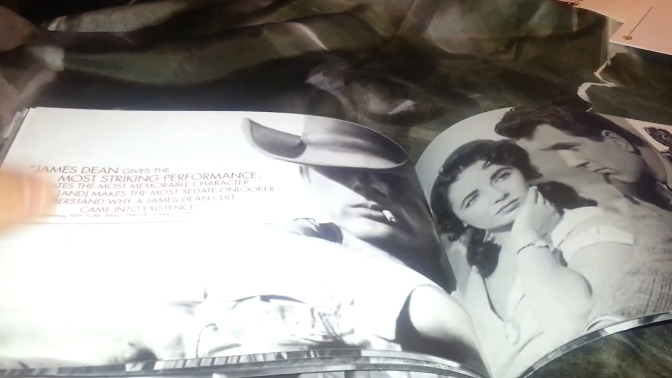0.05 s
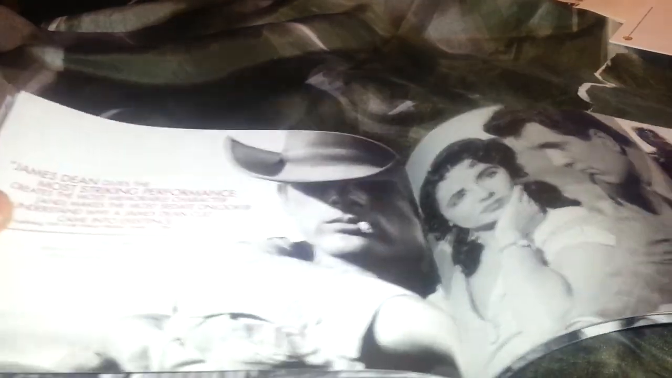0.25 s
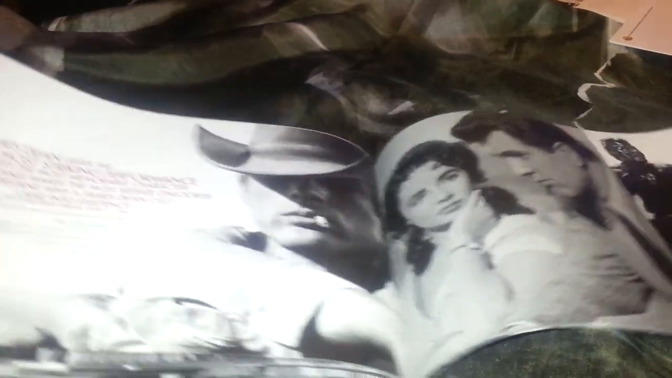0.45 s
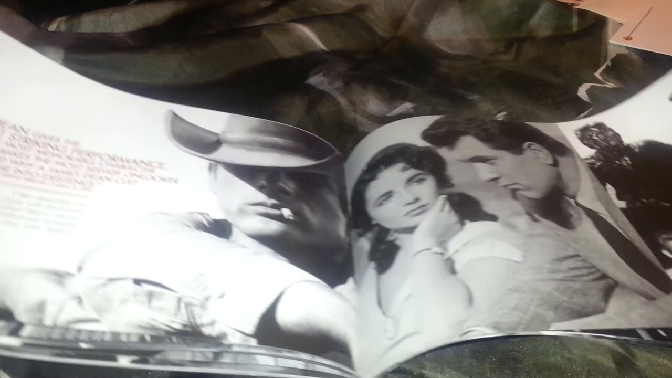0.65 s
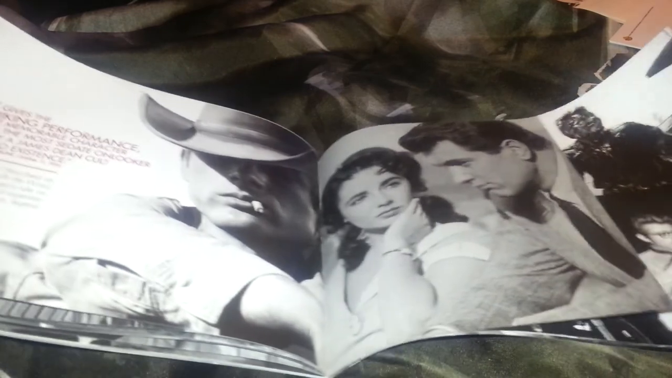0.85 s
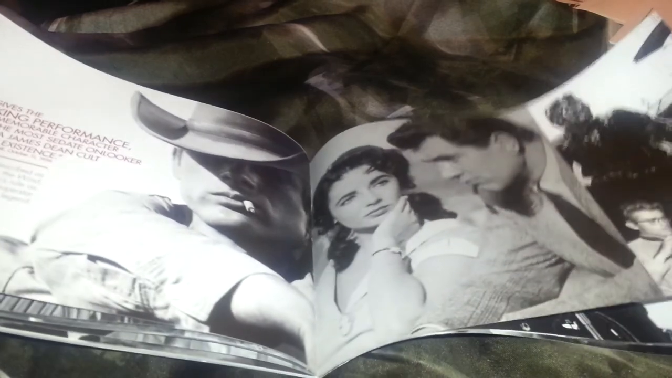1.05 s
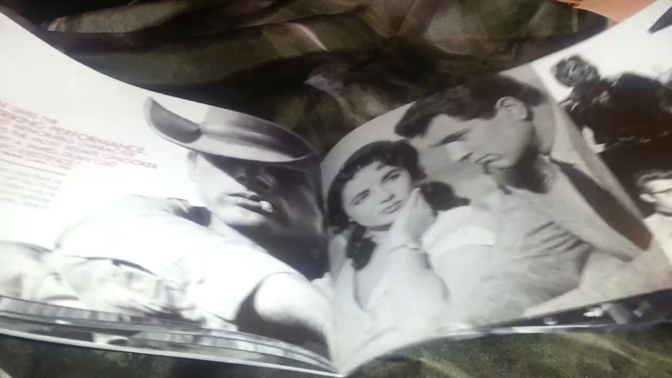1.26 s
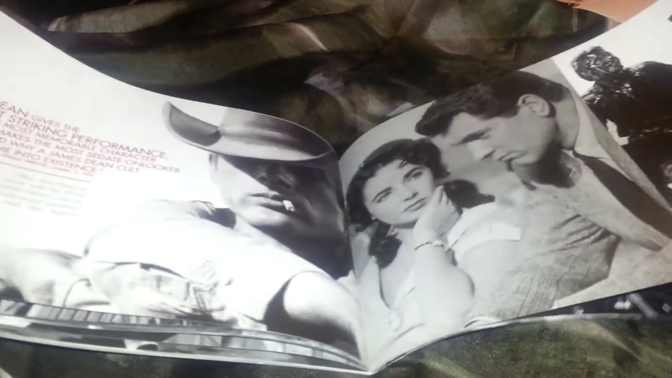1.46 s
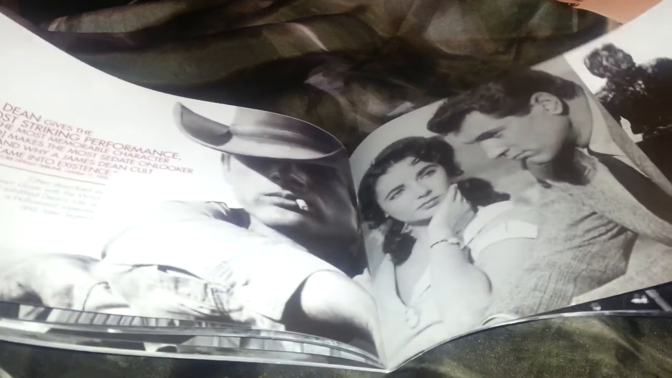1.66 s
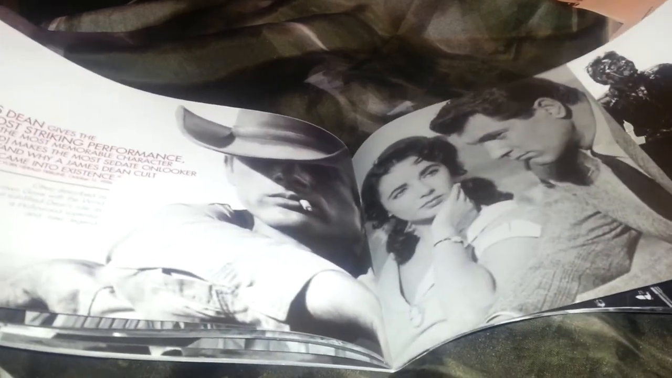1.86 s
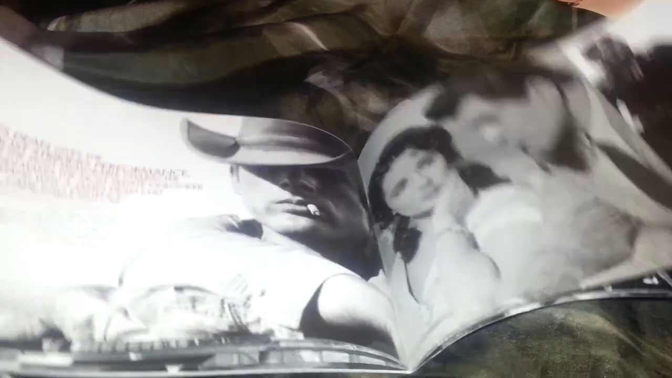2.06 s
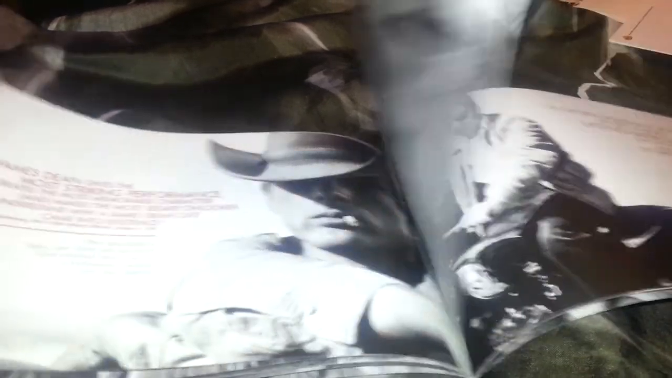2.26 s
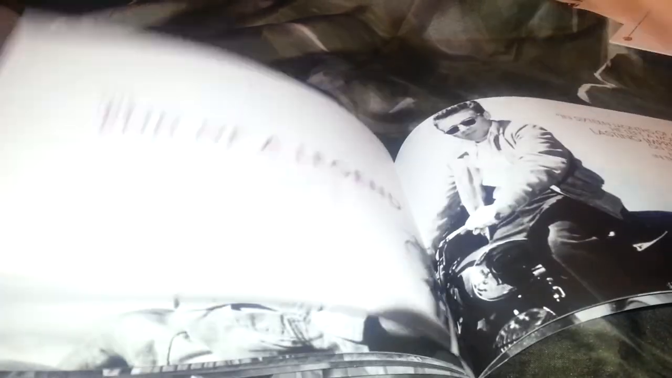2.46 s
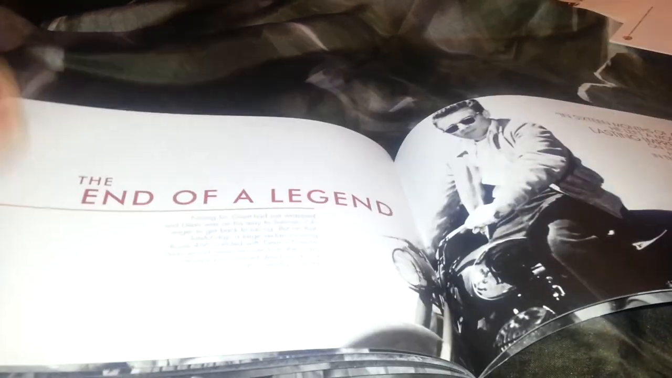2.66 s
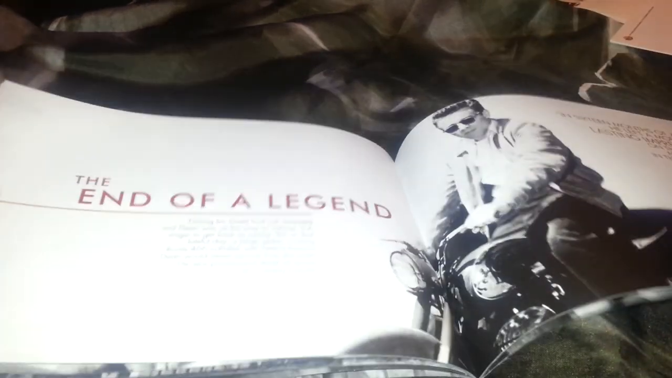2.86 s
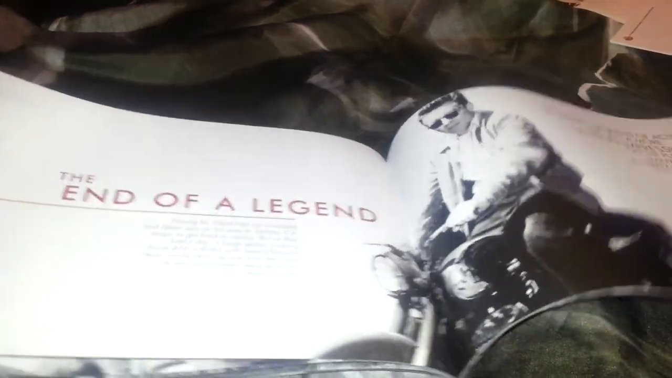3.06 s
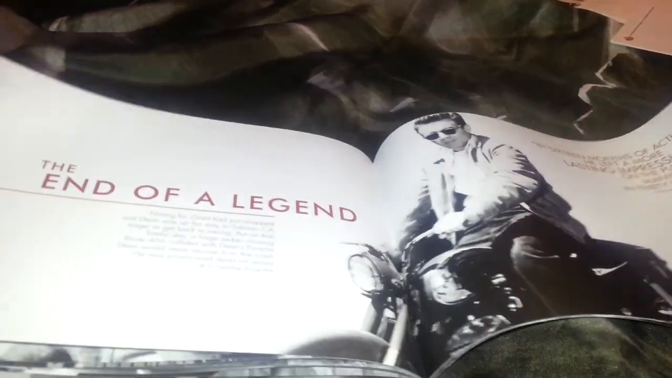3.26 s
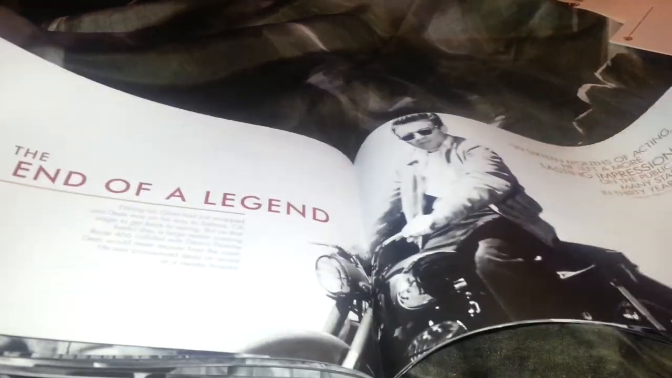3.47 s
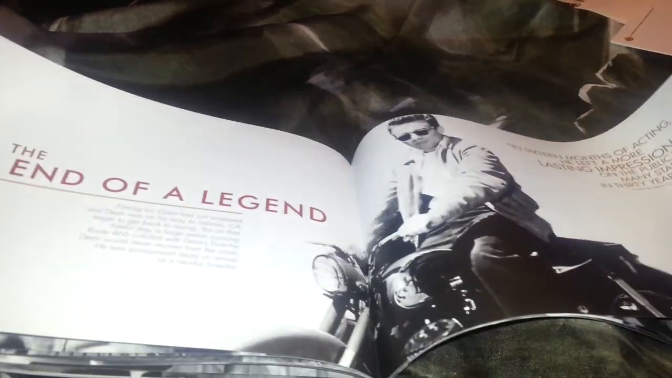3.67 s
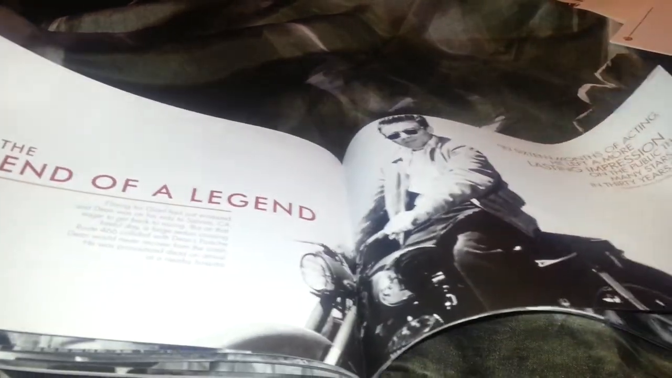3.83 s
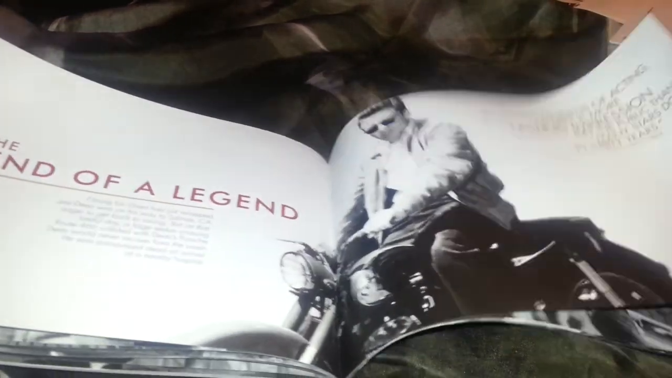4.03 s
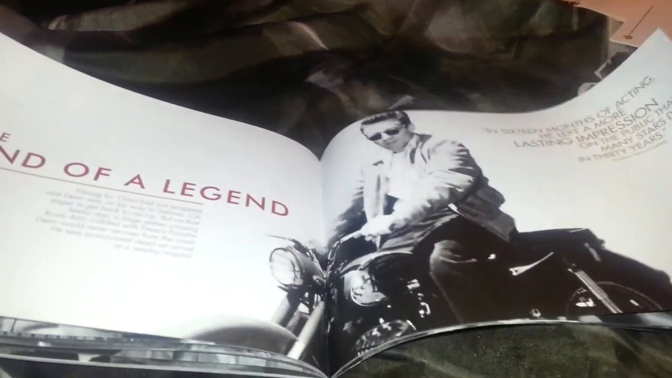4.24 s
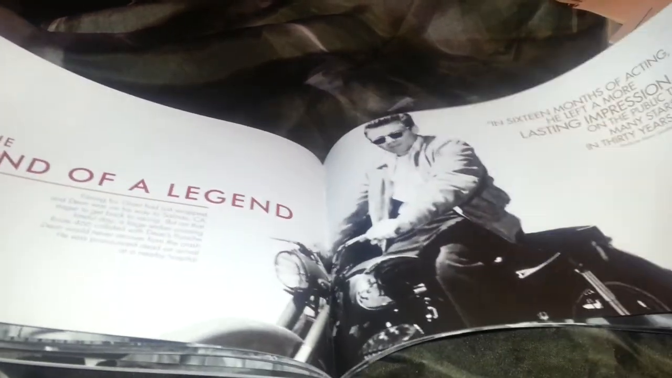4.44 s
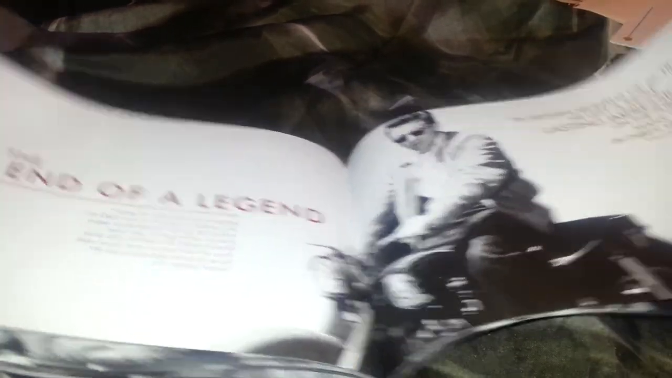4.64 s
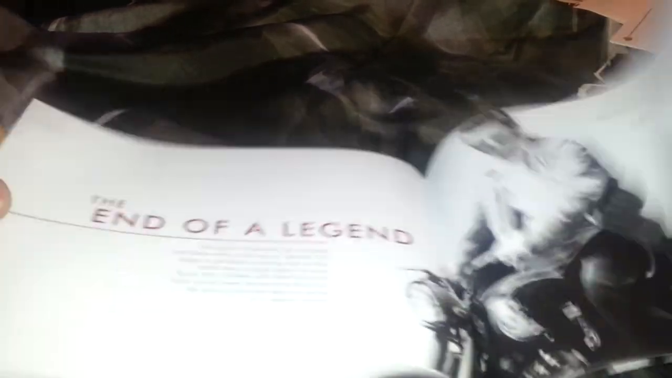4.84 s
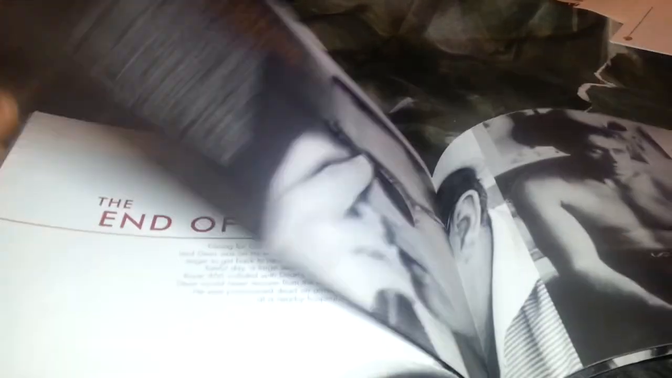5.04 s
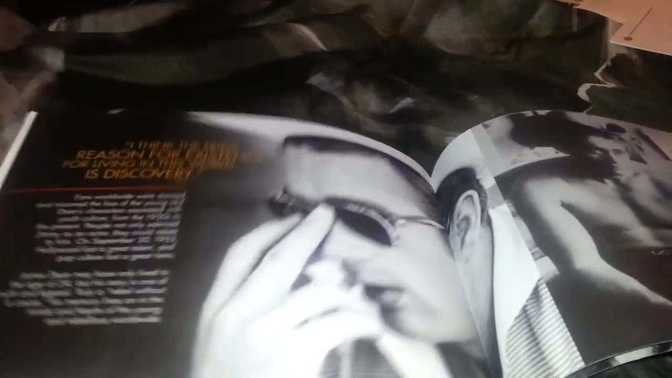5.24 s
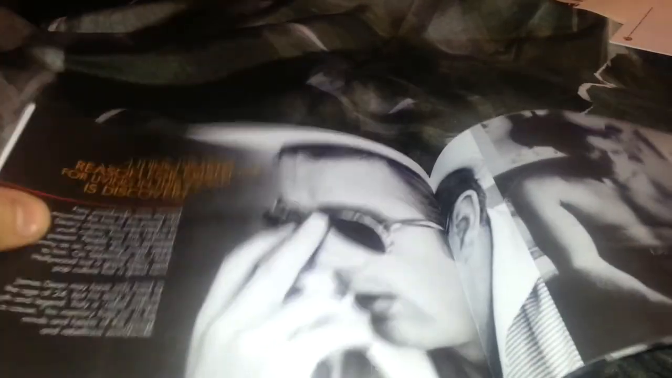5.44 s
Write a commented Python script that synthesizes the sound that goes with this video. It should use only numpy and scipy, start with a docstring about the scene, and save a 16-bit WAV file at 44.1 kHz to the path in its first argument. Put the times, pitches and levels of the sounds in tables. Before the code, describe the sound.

A thumb slides along glossy page edges, which tick and scrape irregularly; after some quiet rustling the sheet buckles over with a brief volley of papery cracks. The same pattern repeats with a firmer, sharper turn. Dull tiny puffs come from the cloth beneath. Near, dry stereo microphones, hardly any room tail, faint wavering hum and soft air noise.

```python
"""Soft rubbing and short swishes over a faint electric hum, in a small, quiet room: two glossy pages turn close by.
For each page a thumb slides along the edges, which tick and scrape past it; then the lifted sheet buckles and flops.
Rubs, scrapes, swishes and cracks are enveloped grainy noise, coloured by paper spectra and resonances.
Ticks are dispersed clicks, shifts on the cloth are low noise puffs, and the hum is three wavering sines in noise.
"""
import sys
import numpy as np
from scipy import signal
from scipy.fft import rfft, irfft, next_fast_len
from scipy.io import wavfile
from scipy.ndimage import uniform_filter1d, map_coordinates

SR = 44100
rng = np.random.default_rng(int(sys.argv[2]) if len(sys.argv) > 2 else 0)


def int16_out(signal):
    """Quantize to a 16-bit WAV file."""
    q = np.round(np.clip(np.atleast_2d(signal).T, -1, 1) * 32767)
    wavfile.write(sys.argv[1], SR, q.astype(np.int16))


N = 242550

# Kinks of the bent sheet: crest_s, level_db, t60_s, panel_hz, bright_to_hz, air_push_db,
# bearing (share of the port phase; positive: right leads, negative: left leads)
BUCKLES = [ (2.248, -34.5, 0.04, 1390, 5500, -10, .7), (2.262, -26, 0.028, 4420, 5500, 0, 0.69),
           (2.271, -15, 0.026, 1820, 2860, 1, 0.62), (2.2743, -12.5, .03, 2000, 4700, -1.5, 0.96),
           (2.282, -20, 0.034, 3480, 9250, -17, 1), (2.288, -17, 0.033, 2050, 3900, -2, 0.99),
           (2.298, -24.5, 0.068, 1420, 2840, -8, -.35), (2.309, -21.5, .06, 1410, 3070, -8, -0.2),
           (2.322, -23, 0.041, 1460, 2030, -24, -0.8), (2.339, -31, 0.088, 1330, 2080, -27, -0.7),
           (4.8305, -28.5, 0.02, 1320, 3740, 7.5, 1), (4.859, -32.5, 0.078, 1200, 5000, 8, 1),
           (4.862, -20, 0.012, 2540, 4500, 3.5, -0.54), (4.926, -18, 0.016, 1420, 3800, -21, -0.95),
           (4.935, -27.5, .05, 1180, 3680, -9, -1.1), (4.942, -19.5, 0.026, 1180, 3730, -7, -0.92),
           (4.947, -11.5, 0.021, 1090, 4060, -6.5, -.25), (4.9502, -9, 0.015, 1130, 4850, -15, -0.66),
           (4.952, -9, .016, 3400, 5040, -14, -0.66), (4.963, -23.5, 0.083, 3300, 4400, -19, -0.89),
           (4.991, -30, .07, 1300, 3200, -6, -.4), (5.216, -43, 0.061, 1620, 5000, -13, 0.72),
           (5.254, -40.5, 0.066, 1510, 5000, -13, 0.2), (5.44, -41.5, 0.11, 1370, 5560, -8, 0.69),
           (5.464, -33.5, 0.065, 1240, 2520, -23, -0.63)]
# Spectrum of the buckling sheet: freq_hz, density_db (per Hz, relative)
SHEET_SPECTRUM = [(60, -41), (300, -29), (750, -13.5), (1200, -1.5), (2000, -3.5), (3000, -1.5),
                  (4500, -2.5), (6000, -12), (10000, -12.5), (14000, -20)]
# Spectrum of the air shoved by the sheet: freq_hz, density_db (per Hz, relative)
PUSH_SPECTRUM = [(40, -36), (120, -11), (330, -2), (550, -9.5), (900, -15), (2000, -35), (14000, -62)]
# Page edges slipping off the thumb: start_s, tick_db (before TICK_GAIN_DB), scrape_db
SLIPS = [ (0.704, -32.5, -34), (0.802, -50, -34), (0.814, -35, -27), (0.885, -31.5, -31.5),
         (0.922, -26, -30.5), (0.983, -29.5, -32), (1.0242, -30, -33.5), (1.0612, -32.5, -36),
         (1.1041, -40, -40), (1.139, -36, -36), (1.176, -35.5, -36.5), (1.212, -45, -42),
         (3.684, -27.5, -35), (3.754, -25.5, -34.5), (3.802, -23, -34.5), (3.8621, -22, -33.5),
         (3.9062, -25, -31), (3.971, -39.5, -36), (4.372, -27, -41)]
# Spectrum of an edge tick: freq_hz, density_db (per Hz, relative)
TICK_SPECTRUM = [(60, -21), (230, 3), (450, 5.5), (1000, -1.5), (1600, 2), (2500, -0.5), (4500, -3.5),
                 (8000, -14), (14500, -12)]
# Spectrum of paper scraping on paper: freq_hz, density_db (per Hz, relative)
SCRAPE_SPECTRUM = [(80, -30), (300, -7.5), (800, -17), (1400, -5), (2400, 0), (3300, -4.5), (4500, -2.5),
                   (6000, -12.5), (9000, -15), (14500, -20.5)]
# Sheet sweeping over its neighbour: middle_s, level_db, half_length_s, resonance_hz
SWEEPS = [ (0.18, -48, 0.014, 3140), (0.618, -44.5, .018, 3500), (0.727, -50, .007, 3180),
          (1.804, -54, 0.024, 2200), (1.927, -52, 0.025, 2420), (2.011, -59, .028, 2580),
          (2.929, -48.5, 0.011, 2830), (3.298, -52.5, 0.014, 3370), (3.462, -46.5, 0.0064, 2620),
          (3.547, -38.5, 0.0088, 3020), (3.598, -48, 0.0087, 2750), (3.624, -44.5, 0.017, 1650),
          (4.071, -38.5, 0.017, 3220), (4.113, -42, 0.013, 2750), (5.289, -44.5, .012, 4000)]
# Moments when a finger or sheet slides: start_s, length_s, rub_db, fizz_db (both before trim)
STROKES = [ (-0.03, 0.036, -51.5, -59), (0.097, 0.13, -54.5, -61.5), (0.257, 0.38, -56.5, -61.5),
           (0.578, .06, -49, -54), (0.665, 0.12, -54.5, -63), (0.847, .39, -51, -59),
           (1.237, 0.053, -44.5, -48.5), (1.293, 0.046, -45, -45.5), (1.427, .075, -53.5, -54.5),
           (1.67, 0.036, -57, -57), (1.89, 0.17, -57, -58), (2.18, .16, -50.5, -55.5),
           (2.558, 0.066, -54, -61), (2.96, 0.15, -62, -69), (3.1, .12, -57.5, -63),
           (3.29, 0.071, -59, -57), (3.352, .13, -47.5, -53.5), (3.505, .13, -43.5, -66),
           (3.697, 0.26, -53, -62), (3.989, 0.14, -48.5, -50.5), (4.195, .09, -50, -51),
           (4.29, 0.072, -53.5, -54.5), (4.358, 0.061, -48, -51), (4.554, 0.095, -53.5, -61),
           (4.647, 0.079, -47, -50.5), (4.728, .28, -46.5, -55), (4.879, 0.028, -44, -46),
           (5.205, 0.095, -50, -51.5), (5.341, .07, -50.5, -67), (5.417, .08, -48, -55.5)]
# Spectrum of rubbing: freq_hz, density_db (per Hz, relative)
RUB_SPECTRUM = [(100, -16), (330, -3), (700, -6), (1050, -4.5), (1600, -2), (2500, 0), (3300, 0.5),
                (4400, -4), (6000, -15), (14000, -21)]
# Spectrum of the brighter fizz: freq_hz, density_db (per Hz, relative)
FIZZ_SPECTRUM = [(200, -14), (1500, -4.5), (4500, 5.5), (6000, -0.5), (9500, -2), (14500, -8)]
# Booklet shifting on the cloth: middle_s, level_db, half_length_s, centre_hz
BUMPS = [(0.99, -55, 0.03, 240), (1.376, -51, 0.013, 302), (2.388, -55, 0.014, 280),
         (4.119, -52, 0.0062, 285), (4.170, -56, 0.014, 190), (5.047, -56, 0.013, 260)]
# Likeness of paper sound at the two ports: freq_hz, likeness (0 to 1, before focus)
PAPER_LIKENESS = [(200, 0.97), (700, 0.8), (2400, 0.9), (3500, 0.62), (6000, 0.21), (14000, 0.59)]
# Lead of the right port at bearing 1: freq_hz, lead_rad
PORT_LEAD = [(100, .02), (700, 0.66), (1600, 1.82), (3300, 1.82), (4400, 2.64), (6000, 6.7), (9000, 8),
             (14000, 27.6)]
# Level difference of the ports: freq_hz, left_minus_right_db
LEFT_MINUS_RIGHT = [(200, 2), (450, 0.5), (900, 0), (1600, 2.5), (2400, 2.5), (4000, -0.2), (6000, -0.5),
                    (14000, 0.5)]
# Decay of the furnished room: freq_hz, t60_s
ROOM_DECAY = [(200, 0.75), (1500, 0.23), (5000, 0.27), (14000, 0.066)]
# Spectrum of the room air: freq_hz, density_db (per Hz, relative)
AIR_SPECTRUM = [(25, -20), (45, -18), (80, -9.5), (120, -5), (200, -0.5), (330, -2.5), (450, -2.5),
                (700, -7), (1100, -9), (2400, -15.5), (3600, -14), (6000, -21.5), (9000, -18.5),
                (14500, -19.5)]
# Likeness of room air at the two ports: freq_hz, likeness (0 to 1)
AIR_LIKENESS = [(30, 0.45), (80, 0.27), (200, 0.39), (450, 0.36), (1000, 0.069), (10000, .02)]
# Partials of the electric hum: freq_hz, silent_level_db (rms, before wavering), full_dip_db
HUM_PARTIALS = [(120.3, -55.5, 8), (160, -67, 2), (268.8, -63.5, 0.5)]

BUCKLE_RISE_SHARE = 0.051  # build-up time constant / t60: a slow kink gathers slowly
TICK_GAIN_DB = 14.0
SCRAPE_RISE_S, SCRAPE_T60_S = 0.0033, 0.084
# a harder slip frees more of the edge, which rings lower
EDGE_HZ, EDGE_AT_DB, EDGE_OCTAVES_PER_DB = 2280, -30, 0.12
STROKE_ATTACK_S, STROKE_RELEASE_S = 0.023, 0.027  # time to full speed; time constant of coming to rest
STROKE_SAG_DB_PER_S = 2.5  # a stroke slows a little as it goes on
RESTING_RUB_DB, RESTING_FIZZ_DB = -72, -71.5  # the hand is never quite still; before trim
RUB_TRIM_DB, FIZZ_TRIM_DB = -1.1, 2.5
DIP_HALF_DB, DIP_SMOOTH_S = -59, 0.026  # rustle rms at half dip; averaging time
TOP_HZ = 14620
EVENT_S = np.arange(SR // 3) / SR  # time within one event
TIME_S = np.arange(N) / SR


def buckles():
    """A kink runs through the sheet: a tight volley of cracks rings the panel and shoves the air."""
    out = np.zeros((2, N))
    lead_in_s = 0.05
    t = EVENT_S - lead_in_s
    for crest_s, level_db, t60_s, panel_hz, bright_to_hz, push_db, bearing in BUCKLES:
        build_up = np.exp(np.minimum(t, 0) / (BUCKLE_RISE_SHARE * t60_s))
        decay = amp(-60 * np.maximum(t, 0) / t60_s)
        cracks = friction(amp(level_db) * build_up * decay, grain_db=0.5)

        def paper_gain(hz):
            """A slack sheet sounds lower and duller than a taut one."""
            dull = 1 / np.sqrt(1 + (hz / bright_to_hz) ** 8)
            dull = dull + amp(-16.5) * (bright_to_hz / 4500) ** 2
            panel = amp(along(SHEET_SPECTRUM, hz)) * resonance(hz, panel_hz, width=0.13, db=2.5)
            return panel * dull + amp(push_db + along(PUSH_SPECTRUM, hz))

        # the upright sheet stands between the ports: less alike
        add(out, crest_s - lead_in_s, ports(colour(cracks, paper_gain), bearing, focus=0.23))
    return out


def slips():
    """An edge lets go with a tick, then scrapes over the next page; both ring its resonance."""
    out = np.zeros((2, N))
    click = np.outer([1, 0.4], bending_wave(spread=0.154))  # direct, scattered
    rise = np.minimum(EVENT_S / SCRAPE_RISE_S, 1) ** 0.5
    fall_db = -60 * np.maximum(EVENT_S - SCRAPE_RISE_S, 0) / SCRAPE_T60_S
    for start_s, tick_db, scrape_db in SLIPS:
        edge_hz = EDGE_HZ * 2 ** (EDGE_OCTAVES_PER_DB * (EDGE_AT_DB - tick_db))
        tick = colour(
            amp(tick_db + TICK_GAIN_DB) * click,
            lambda hz: amp(along(TICK_SPECTRUM, hz)) * resonance(hz, edge_hz, width=0.22, db=-3))
        scrape = colour(
            friction(amp(scrape_db + fall_db) * rise, grain_db=3.5),
            lambda hz: amp(along(SCRAPE_SPECTRUM, hz)) * resonance(hz, edge_hz, width=0.13, db=-3.0))
        add(out, start_s, ports(tick + scrape, bearing=1))
    return out


def bending_wave(spread):
    """A click that has crossed a thin sheet: its treble arrives before its bass."""
    hz = np.fft.rfftfreq(len(EVENT_S), 1 / SR)
    click = irfft(np.exp(-1j * spread * np.sqrt(hz)), len(EVENT_S))  # spread: rad per root Hz
    return click * (EVENT_S < EVENT_S[-1] / 2)


def sweeps():
    """Short swells of friction, each through one resonance of the curved sheet."""
    out = np.zeros((2, N))
    middle_s = EVENT_S[-1] / 2
    for s, level_db, half_s, panel_hz in SWEEPS:
        swell = friction(amp(level_db) * np.exp(-0.5 * ((EVENT_S - middle_s) / half_s) ** 2), grain_db=-0.5)
        swish = colour(
            swell,
            lambda hz: amp(along(SCRAPE_SPECTRUM, hz)) * resonance(hz, panel_hz, width=0.07, db=9.0))
        add(out, s - middle_s, ports(swish, bearing=0.92))
    return out


def sliding(rub_db, fizz_db):
    """Fingers and sheets rub all the while; uneven pressure makes the rustle flutter."""
    pressure_db = 1.2 * wobble(50)
    rub = colour(friction(np.ones(N), grain_db=3.5), shape(RUB_SPECTRUM))
    rub = rub * amp(rub_db + pressure_db + RUB_TRIM_DB)
    fizz = colour(friction(np.ones(N), grain_db=2.5), shape(FIZZ_SPECTRUM))
    fizz = fizz * amp(fizz_db + pressure_db + FIZZ_TRIM_DB)
    return ports(rub + fizz, bearing=1, focus=0.74)


def hand_motion():
    """Rub and fizz levels in dB: every stroke speeds up, sags and comes to rest."""
    power = np.outer(amp([RESTING_RUB_DB, RESTING_FIZZ_DB]) ** 2, np.ones(N))
    for start_s, length_s, rub_db, fizz_db in STROKES:
        t = np.maximum(TIME_S - start_s, 0)
        attack = np.minimum(t / STROKE_ATTACK_S, 1)
        release = np.exp(-np.maximum(t - length_s, 0) / STROKE_RELEASE_S)
        sag = amp(-STROKE_SAG_DB_PER_S * t)
        power += np.outer(amp([rub_db, fizz_db]), attack * release * sag) ** 2
    return 10 * np.log10(power)


def bumps():
    """Cloth cushions each shift of the booklet into a dull, low puff."""
    out = np.zeros((2, N))
    middle_s = EVENT_S[-1] / 2
    for s, level_db, half_s, centre_hz in BUMPS:
        push = friction(amp(level_db) * np.exp(-0.5 * ((EVENT_S - middle_s) / half_s) ** 2), grain_db=-1.0)
        puff = colour(push, lambda hz: 1 / (1 + ((hz - centre_hz) / (0.37 * centre_hz)) ** 2))
        add(out, s - middle_s, ports(puff, bearing=1))
    return out


def friction(envelope, grain_db):
    """Tiny fibre releases of uneven size: a direct and a scattered row, each with the envelope's energy."""
    size = len(envelope)
    clumps = unit(uniform_filter1d(rng.standard_normal(size), size=16))
    pair = envelope * rng.standard_normal((2, size)) * amp(grain_db * clumps)
    return np.array([unit(row) for row in pair]) * np.sqrt(np.mean(envelope ** 2))


def ports(pair, bearing, focus=1):
    """Direct sound (row 0) reaches two ports out of step; scattered sound (row 1) blurs their likeness."""
    size = pair.shape[1]
    m = next_fast_len(size + 256)
    hz = np.fft.rfftfreq(m, 1 / SR)
    mid, side = rfft(pair, m) * blend(focus * along(PAPER_LIKENESS, hz))
    turn = np.exp(0.5j * bearing * along(PORT_LEAD, hz))
    turn = turn * amp(-along(LEFT_MINUS_RIGHT, hz) / 2)
    return irfft(np.array([(mid + side) / turn, (mid - side) * turn]), m)[:, :size]


def blend(likeness):
    """Mid and side gains that give two ports this likeness."""
    blur_rad = np.arccos(np.clip(likeness, 0, 1)) / 2
    return np.array([np.cos(blur_rad), np.sin(blur_rad)])


def colour(x, gain):
    """Causal (minimum-phase) filter with the given gain; keeps the energy."""
    m = 2 * next_fast_len(x.shape[-1] // 2 + 2048)
    cepstrum = irfft(np.log(gain(np.fft.rfftfreq(m, 1 / SR)) + 1e-6))
    cepstrum[1:m // 2] *= 2  # fold onto positive time
    cepstrum[m // 2 + 1:] = 0
    y = irfft(rfft(x, m) * np.exp(rfft(cepstrum)))[..., :x.shape[-1]]
    return unit(y) * np.sqrt(np.mean(x ** 2))


def resonance(hz, centre_hz, width, db):
    """Gain of one resonance over a flat floor; width is a share of its centre."""
    return 1 + amp(db) / np.sqrt(1 + ((hz - centre_hz) / (width * centre_hz)) ** 4)


def shape(points):
    """A spectrum as a gain function of frequency."""
    return lambda hz: amp(along(points, hz))


def along(points, hz):
    """Read (Hz, value) points on a log frequency axis."""
    point_hz, values = np.transpose(points)
    return np.interp(np.log(hz + 1), np.log(point_hz), values)


def amp(db):
    """Decibels to gain."""
    return 10 ** (np.asarray(db) / 20)


def unit(x):
    """Scale to rms 1."""
    return x / np.sqrt(np.mean(x ** 2) + 1e-20)


def wobble(rate_hz):
    """A smooth random curve with rate_hz knots a second."""
    knots = rng.standard_normal(int(N * rate_hz / SR) + 4)
    return map_coordinates(knots, [TIME_S * rate_hz])


def add(track, s, sound):
    """Mix a sound into the track at time s."""
    start = max(round(s * SR), 0)
    part = track[:, start:start + sound.shape[-1]]
    part += sound[..., :part.shape[-1]]


def room(x, tail_db):
    """The furnished room adds a faint, short tail: noise decaying at its own rate in each band."""
    size = len(EVENT_S)
    hz, t, bands = signal.stft(rng.standard_normal((2, size)), SR, nperseg=256)
    decay = amp(-60 * t / along(ROOM_DECAY, hz)[:, None])
    tail = signal.istft(bands * decay, SR, nperseg=256)[1][:, :size]
    answer = amp(tail_db) * unit(tail) / np.sqrt(size)
    return x + signal.fftconvolve(x, answer, axes=1)[:, :N]


def background(paper):
    """Steady room air with an electric hum that wavers and dips whenever the paper rustles."""
    hz = np.fft.rfftfreq(N, 1 / SR)
    spectra = rfft(rng.standard_normal((2, N))) * amp(along(AIR_SPECTRUM, hz))
    mid, side = irfft(spectra * blend(along(AIR_LIKENESS, hz)), N)
    air = amp(-55.0) * unit(np.array([mid + side, mid - side]))
    rustle_power = np.abs(uniform_filter1d(np.mean(paper ** 2, axis=0), size=int(DIP_SMOOTH_S * SR)))
    dip = rustle_power / (rustle_power + amp(DIP_HALF_DB) ** 2)
    hum = np.zeros(N)
    for freq_hz, level_db, full_dip_db in HUM_PARTIALS:
        gain = amp(level_db - full_dip_db * dip + 1.06 * wobble(6.3))
        phase_rad = 2 * np.pi * freq_hz * TIME_S + 0.36 * wobble(4.14)
        hum += gain * np.sqrt(2) * np.sin(phase_rad)
    return air + hum


def scene():
    """All the paper sounds share one room."""
    paper = buckles() + slips() + sweeps() + sliding(*hand_motion()) + bumps()
    return room(paper, tail_db=-17.5) + background(paper)


def record(dry):
    """Clip at full scale, then cut steeply above the band limit."""
    m = next_fast_len(N + SR // 2)
    keep = 1 / np.sqrt(1 + (np.fft.rfftfreq(m, 1 / SR) / TOP_HZ) ** 200)
    return irfft(rfft(np.clip(dry, -1, 1), m) * keep, m)[:, :N]


dry = scene()
out = record(dry)
int16_out(out)
```